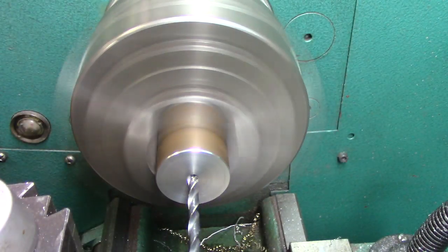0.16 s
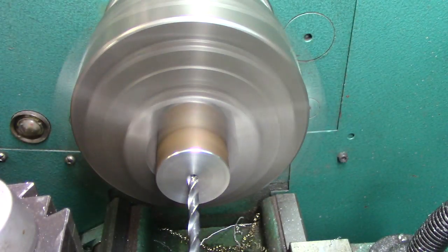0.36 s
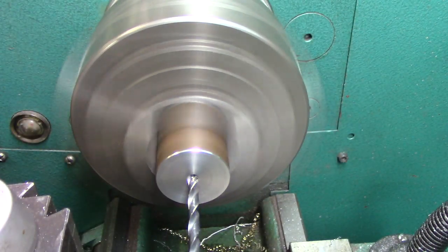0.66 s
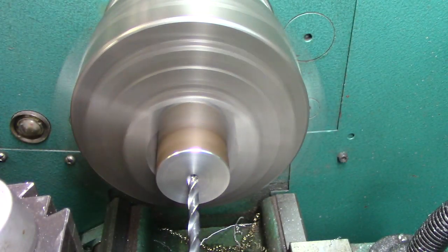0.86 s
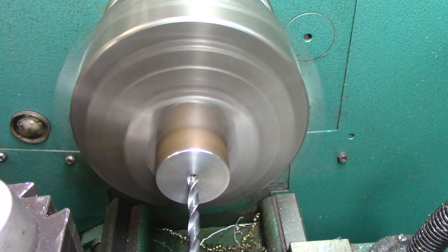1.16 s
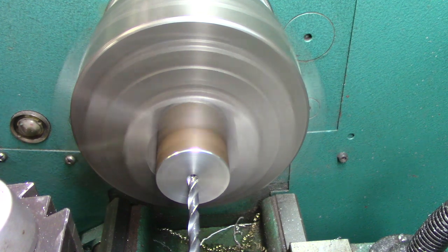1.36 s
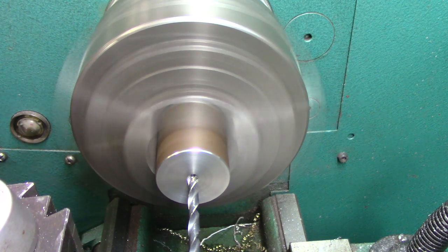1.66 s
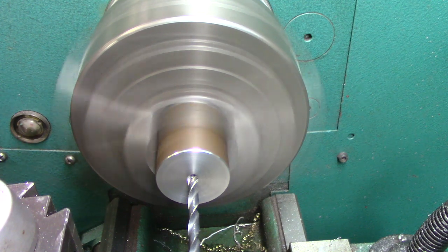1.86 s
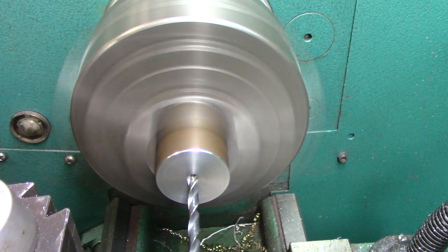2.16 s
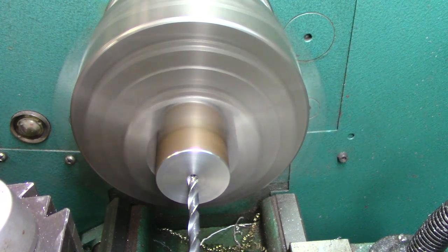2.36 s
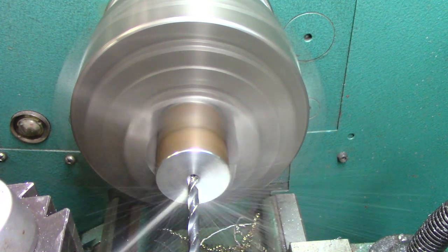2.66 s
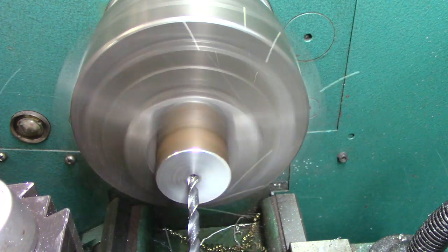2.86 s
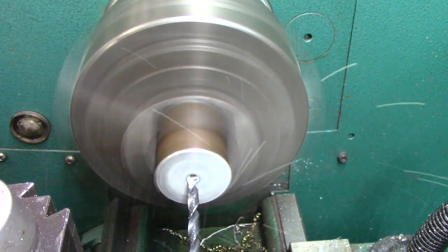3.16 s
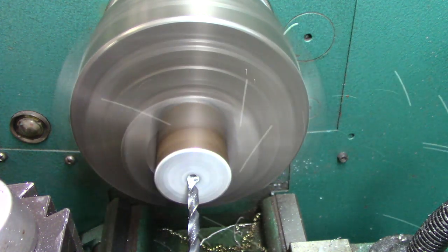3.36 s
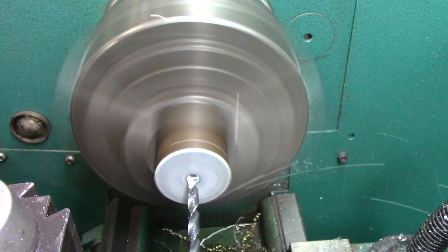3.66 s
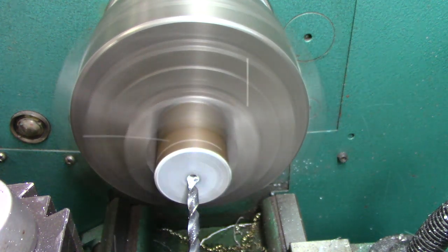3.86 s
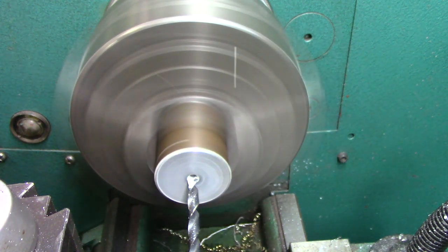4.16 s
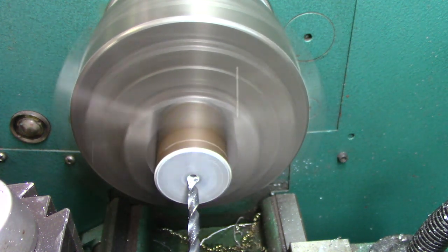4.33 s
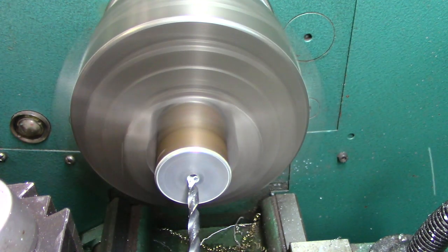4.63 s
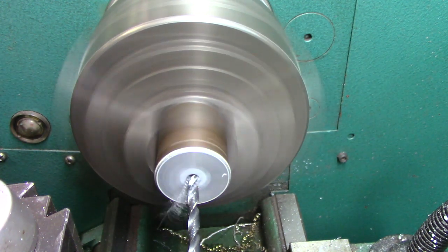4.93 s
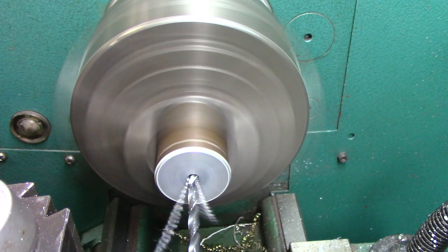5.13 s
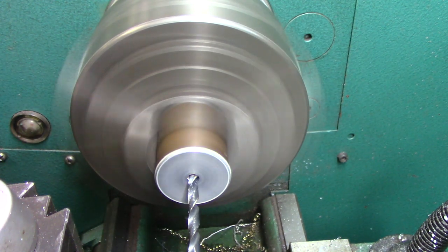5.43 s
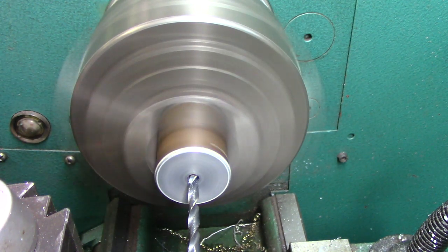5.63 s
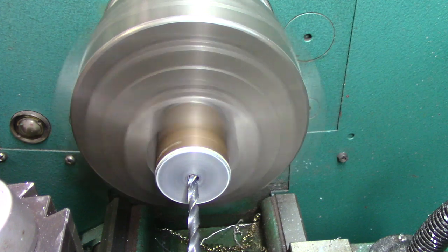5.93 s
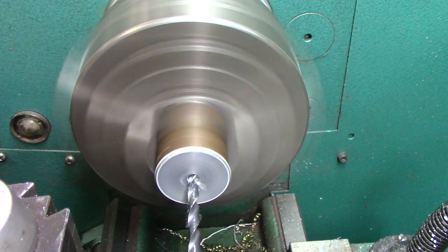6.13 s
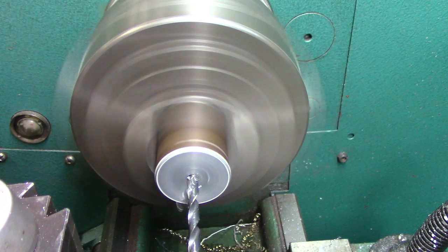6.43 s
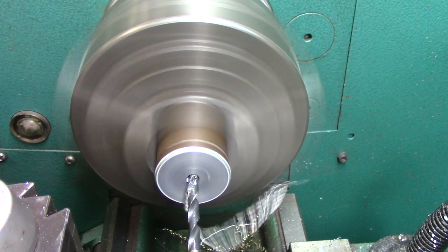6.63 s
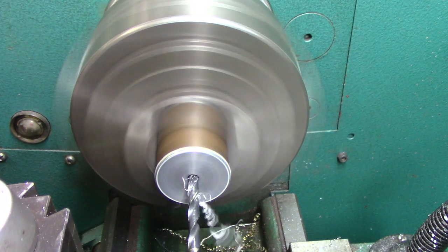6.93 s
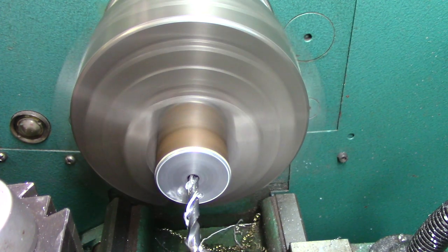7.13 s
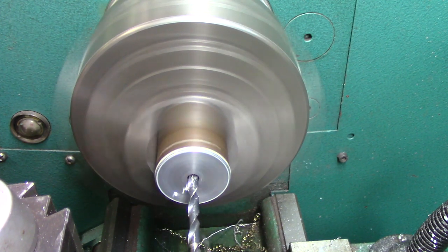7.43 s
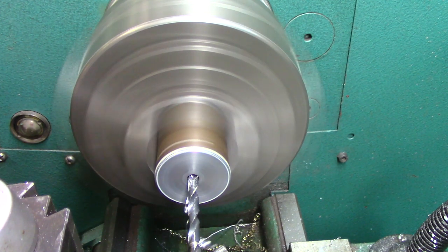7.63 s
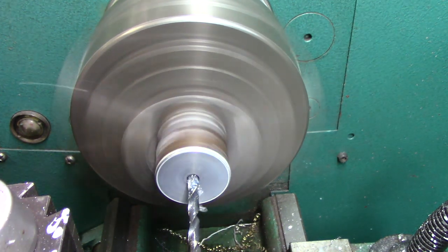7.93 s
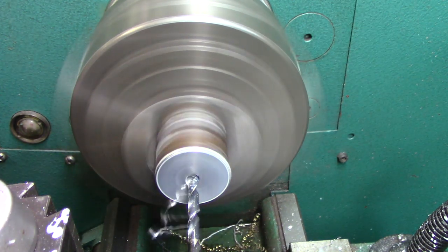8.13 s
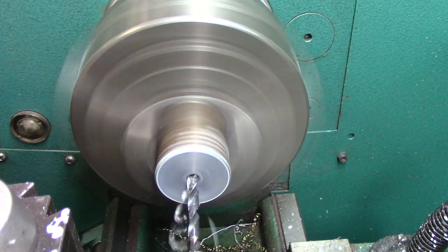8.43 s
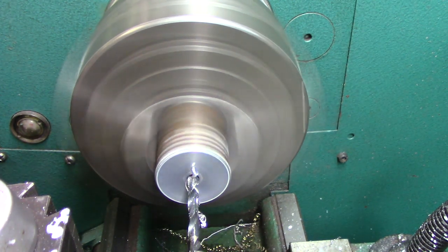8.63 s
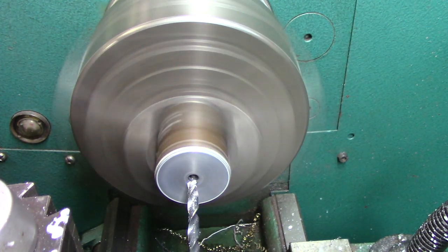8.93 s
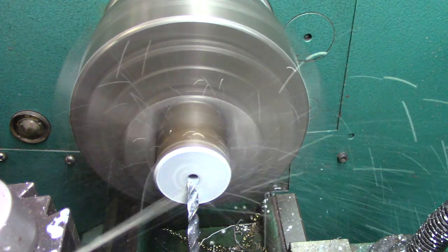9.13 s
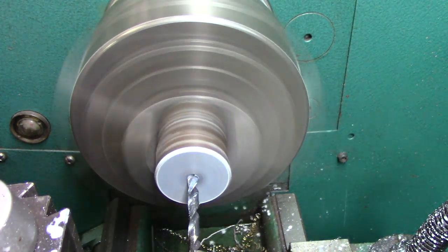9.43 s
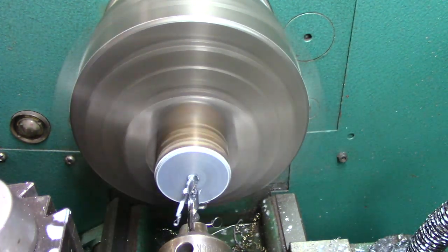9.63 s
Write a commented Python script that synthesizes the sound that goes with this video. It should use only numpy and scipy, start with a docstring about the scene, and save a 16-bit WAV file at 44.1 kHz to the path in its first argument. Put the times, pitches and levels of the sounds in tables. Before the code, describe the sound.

Whining, clattering lathe gears and two short sprays give way to a sped-up, high-pitched whine with drill squeals and a brief clunking halt.

```python
"""A geared metal lathe turns a bar: gear teeth whine and rattle in the headstock, the work sings thinly.
At 1.1 s a twist drill bites and the clatter thickens; at 2.6 and 2.9 s cutting oil hisses on the work.
From 4.5 s time runs ten times faster and the lathe turns thin and shrill, with squeals now and then.
At 5.8 s the drive drops out with a clunk and the spindle coasts down; at 6 s it clunks back to speed.
Near 7.9 s the lower spindle tone swells as the feed eases, and one dull tick falls near the end."""
import sys
import numpy as np
from scipy import signal
from scipy.fft import rfft, irfft, next_fast_len
from scipy.io import wavfile

SR = 44100
rng = np.random.default_rng(int(sys.argv[2]) if len(sys.argv) > 2 else 0)


def wav_record(signal):
    """Record a signal, one row per channel, as 16-bit PCM in the file named by sys.argv[1]."""
    frames = np.transpose(np.atleast_2d(signal))
    bounded = np.clip(frames, -1, 1)
    # unit amplitude maps onto the largest positive 16-bit level
    quanta = np.round(bounded * 32767).astype(np.int16)
    wavfile.write(sys.argv[1], SR, quanta)


N = 431738
TIME = np.arange(N) / SR

# Partials of the gear whine at natural pace: pitch_hz, relative_level_db
GEAR_PARTIALS = [(294.4, -25.5), (315.9, -20), (359.4, -24.5), (400.1, -24.5), (427.6, -18.5), (800, -8.5),
                 (900.1, -20), (1187.5, -13), (1200, 2), (1263.7, -18), (1358.2, -16), (1600, -9),
                 (1999, -16), (2263, -16.5), (2799, -16)]
# Slow swell and fade of the whine at natural pace: time_s, level_db
WHINE_SWELL = [(0, -32.5), (0.6, -33), (0.85, -31.5), (1.1, -31), (1.6, -30.0), (1.95, -32), (2.25, -31.0),
               (2.55, -33), (2.87, -28.5), (3.05, -32), (3.4, -30.5), (3.7, -31), (3.9, -28.5),
               (4.1, -31.5), (4.5, -30)]
# Broad EQ of the headstock clatter at natural pace: frequency_hz, gain_db
CLATTER_EQ = [(30, -46), (120, -40.5), (200, -32.5), (270, -19.5), (340, -16), (400, -4.5), (670, -7),
              (900, 0.5), (1600, -3), (2600, -6.5), (4000, -14.5), (6500, -25), (9000, -33.5),
              (15600, -44.5)]
# Narrow peaks and notches that colour the clatter, from housing and room: centre_hz, width_hz, gain_db
CLATTER_RIPPLE = [(178, 15, 6.5), (223, 23, 4.5), (359.5, 13, 6.5), (400.5, 11, 6.5), (427, 17, 7.5),
                  (440.5, 8, -5.5), (467.5, 11, -2.5), (504.5, 11, 4.5), (513.5, 11, -5.5),
                  (536.5, 15, 8.5), (558.5, 13, -5.5), (581, 23, 7.5), (732, 17, 5.5), (760, 17, 4.5),
                  (825, 15, 5.5), (863, 11, 3.5), (899, 15, 8.5), (945, 26, 2.5), (983, 15, -3.5),
                  (1015, 15, -4.5), (1110, 26, 2.5), (1184, 42, 5.5), (1243, 22, -4.5), (1267, 19, 9.5),
                  (1289, 17, -6.5), (1321, 17, 2.5), (1396, 17, 3.5), (1463, 17, 3.5), (1825, 110, 1.5),
                  (2355, 55, 2.5), (2801, 28, 6.5), (3190, 90, 2.5), (4100, 38, 3.5)]
# Thin singing of the turning work: pitch_hz, phase_waver_rad, free_level_db, drilling_level_db
WORK_TONES = [(4720, 2, -68, -67.5), (4960, 1.1, -57, -53), (5440, 2.1, -57.5, -63.5), (5873, 1, -62, -60)]
# Presses on the oil can: start_s, swell_s, peak_db
OIL_PRESSES = [(2.627, .06, -26), (2.909, .066, -27)]
# EQ of the oil hiss: frequency_hz, gain_db
SPRAY_EQ = [(1500, -33.5), (3000, -3), (5000, -9), (6200, -6.5), (7300, -2.5), (8800, -5.5), (9800, -1),
            (10800, -2.5), (13500, -5), (16000, -12)]
# Motor speed at fast pace, heard in the main mesh, sagging whenever the drill is fed: time_s, pitch_hz
MESH_PITCH = [(4.55, 12005), (4.8, 12007), (5.05, 11992), (5.45, 11998), (5.78, 12011), (6.2, 11980),
              (6.55, 11978), (6.8, 11989), (6.9, 11981), (7.12, 11989), (7.25, 11969), (7.64, 11984),
              (7.8, 12011), (8.03, 11973), (8.48, 11980), (8.75, 12011), (9.55, 12010), (9.79, 11972)]
# Three steady stretches at fast pace, unloaded: start_s, whine_db, lower_tone_db, rumble_db, rattle_db
FAST_MIX = [(4.53, -33, -39.5, -35.5, -29.5), (5.232, -38, -45, -40.5, -35), (5.99, -37, -42.5, -40, -34)]
# Upper spindle tone at fast pace, one list before the halt and one after: time_s, level_db
UPPER_TONE_FADES = [
    [(4.56, -56.5), (5.15, -43.5), (5.45, -57), (5.478, -54), (5.8, -61)],
    [(6.02, -56), (6.14, -62), (6.89, -54), (9.44, -58), (9.78, -45.5)],
]
# Drill squeals and scrapes, plus (at 4530 Hz) the lower spindle tone swelling as the feed eases:
# centre_s, half_length_s, pitch_hz, width_hz, peak_db
SQUEALS_AND_SWELL = [(4.838, .055, 7400, 250, -34), (5.17, 0.097, 4800, 420, -36.5),
                     (5.718, .01, 3800, 500, -43), (5.985, 0.0064, 5240, 486, -34),
                     (5.994, 0.018, 2630, 494, -48.5), (6.063, 0.011, 5440, 100, -33),
                     (6.09, .025, 5300, 120, -42), (6.08, 0.016, 3500, 400, -42),
                     (6.139, .035, 4820, 350, -41), (6.222, 0.024, 4760, 260, -40),
                     (7.17, 0.051, 12300, 200, -38.5), (7.881, .35, 4530, 40, -44.5),
                     (7.82, .2, 4000, 350, -50.5), (9.17, .5, 4000, 380, -43.5)]
# Knocks as the drive drops out and takes up again: start_s, level_db
DRIVE_KNOCKS = [(5.816, -33), (5.979, -41), (5.984, -32.5)]
# Ring of the chuck: pitch_hz, relative_level_db, t60_s
CHUCK_MODES = [(2240, -13, 0.041), (2790, -25, 0.46), (3500, -8, 0.053), (4220, -25, .1), (4830, -10, 0.35),
               (8400, -22, 0.33), (8980, 1.5, 0.049), (13900, -6, .02)]

FAST_FROM_S, FAST_PACE, CUTOFF_HZ = 4.531, 10, 15800
MAIN_MESH_HZ, SPINDLE_HZ, LAYSHAFT_HZ = 1200, 10.52, 12.5   # at natural pace
LOWER_TONE_HZ, UPPER_TONE_HZ = 452.8, 632.2   # spindle tones at natural pace
MOTOR_OFF_S, MOTOR_ON_S = 5.82, 6.0


def from_db(db):
    """Decibels to gain."""
    return 10 ** (np.asarray(db) / 20)


def rms_one(x):
    """Scale to unit power."""
    return x / np.sqrt(np.mean(x ** 2) + 1e-20)


def ramp(start_s, length_s):
    """A straight fade from 0 to 1."""
    return np.clip((TIME - start_s) / length_s, 0, 1)


def automation(rows):
    """Breakpoints (time_s, value) as a curve, one value a sample."""
    return np.interp(TIME, *np.transpose(rows))


def eq_db(points, hz):
    """Read an EQ curve on a log-frequency axis."""
    f, db = np.transpose(points)
    return np.interp(np.log(hz + 1), np.log(f), db)


def filtered(x, gain_at):
    """Pass a signal through a response given as a function of frequency."""
    size = next_fast_len(len(x), True)
    hz = np.arange(size // 2 + 1) * SR / size
    return irfft(rfft(x, size) * gain_at(hz), size)[:len(x)]


def drift(rate):
    """Smooth random modulation, changing about rate times a second; rms 1."""
    knots = rng.standard_normal(int(rate * N / SR) + 2)
    return rms_one(np.interp(TIME * rate, np.arange(len(knots)), knots))


def dull(clicks, top_hz=1500):
    """Soften clicks with a low-pass and make up their height."""
    low_pass = signal.butter(2, top_hz, fs=SR, output="sos")
    return signal.sosfilt(low_pass, clicks + 1e-18) * SR / (2 * top_hz)


def crackle(per_s=190, spread_db=3):
    """Dull clicks at random moments."""
    onsets = rng.random(N) < per_s / SR
    return dull(onsets * rng.choice([-1, 1], N) * from_db(spread_db * rng.standard_normal(N)))


def work_singing(bite, throb_db=3.0, waver_rate=45):
    """The turning work sings high, thin tones that pulse twice a turn and rebalance as the drill bites."""
    angle = 2 * np.pi * TIME * SPINDLE_HZ
    throb = rms_one(from_db(throb_db * (np.sin(angle) + np.sin(2 * angle))))
    tones = np.zeros(N)
    for hz, waver, free_db, drilling_db in WORK_TONES:
        level = from_db(free_db + bite * (drilling_db - free_db))
        tones += level * np.sin(2 * np.pi * hz * TIME + waver * drift(waver_rate))
    return np.sqrt(2) * throb * tones


def drive_clunks(rise_s=.001):
    """Backlash closes with a soft knock and the chuck rings on."""
    out, t = np.zeros(N), TIME[:SR // 2]
    ring = sum(from_db(db - 60 * t / t60) * np.sin(2 * np.pi * hz * t) for hz, db, t60 in CHUCK_MODES)
    attack = 1 - np.exp(-(t / rise_s) ** 2)
    for start_s, db in DRIVE_KNOCKS:
        start = int(start_s * SR)
        out[start:start + len(t)] += from_db(db) * ring * attack
    return out


def squeals_and_swell():
    """Wavering tones fade in and out: squeals of the rubbing drill, one swell of the lower spindle tone."""
    out = np.zeros(N)
    for centre_s, half_s, hz, width_hz, db in SQUEALS_AND_SWELL:
        start, size = int((centre_s - half_s) * SR), int(2 * half_s * SR)
        band = filtered(rng.standard_normal(size), lambda f: (1 + ((f - hz) / width_hz) ** 2 / 2) ** -2)
        tone = np.cos(np.angle(signal.hilbert(band)))   # flatten the level, keep the wandering pitch
        tone = filtered(tone, lambda f: np.exp(-((f - hz) / (2 * width_hz)) ** 2))   # keep it narrow
        out[start:start + size] += from_db(db) * np.hanning(size) * rms_one(tone)
    return out


def oil_spray(valve_s=.003, spit_s=.016, gap_s=.008, hold_s=.014, bounce_s=.0011):
    """Each press spits, catches on air, swells to a jet and dribbles; the hiss bounces off the chuck."""
    rise_db_per_s, fall_db_per_s, dribble_db_per_s = 249.5, 420, 200
    level = np.zeros(N)
    for start_s, swell_s, db in OIL_PRESSES:
        early = np.maximum(start_s + swell_s - hold_s - TIME, 0)
        late = np.maximum(TIME - start_s - swell_s, 0)
        spit = from_db(-5.5) * (1 - ramp(start_s + spit_s, valve_s))
        jet = from_db(-rise_db_per_s * early - fall_db_per_s * late)
        jet *= ramp(start_s + spit_s + gap_s, valve_s)
        dribble = from_db(-20 - dribble_db_per_s * late)   # what is left in the tube
        level += from_db(db) * ramp(start_s, valve_s) * np.max([spit, jet, dribble], axis=0)
    noise = rng.standard_normal(N)
    sputter_db, droplet_db = 2 * drift(260), 2 * drift(2500)
    hiss = filtered(noise * from_db(sputter_db + droplet_db),
                    lambda f: from_db(eq_db(SPRAY_EQ, f)) * (1 + .5 * np.exp(-2j * np.pi * f * bounce_s)))
    return level * rms_one(hiss)


def tooth_errors(turns, harmonics):
    """The flaws of a wheel: a random pattern that loops on every turn; rms 1."""
    pattern = irfft(np.r_[0, np.exp(2j * np.pi * rng.random(harmonics))], 4096)
    return rms_one(pattern)[(turns % 1 * len(pattern)).astype(int)]


def headstock_clatter(clock, pace, wear, throb_db, grit_db, ripple, grit_rate=250, split_hz=650):
    """Teeth rub and rattle in the headstock; returns the low rumble and the upper rattle, rms 1 each."""
    spindle, layshaft = clock * SPINDLE_HZ, clock * LAYSHAFT_HZ
    pressure = from_db(throb_db * tooth_errors(spindle, 6) + grit_db * drift(grit_rate * pace))
    blows = tooth_errors(spindle, 150) + tooth_errors(layshaft, 126)   # worn teeth, turn after turn
    blows *= np.sqrt(CUTOFF_HZ * pace / FAST_PACE / SR)
    force = pressure * rng.standard_normal(N) + wear * blows

    def colour(hz):
        """Broad EQ plus the narrow peaks and notches of housing and room."""
        ripple_db = sum(db / (1 + (2 * (hz - f) / width) ** 2) for f, width, db in CLATTER_RIPPLE)
        return from_db(eq_db(CLATTER_EQ, hz) + ripple * ripple_db)

    clatter = filtered(force, lambda f: colour(f / pace))
    rumble = filtered(clatter, lambda f: 1 / (1 + (f / pace / split_hz) ** 16))
    return rms_one(rumble), rms_one(clatter - rumble)


def gear_whine(clock, pace, tones, runout, tooth_error, waver, twist, waver_rate):
    """Meshing teeth sing; an off-centre wheel swells them once a turn and tooth errors add sidebands."""
    spindle, layshaft = clock * SPINDLE_HZ, clock * LAYSHAFT_HZ
    swell = 1 + runout * np.sin(2 * np.pi * layshaft)
    out = np.zeros(N)
    for hz, db in tones:
        if hz * pace < CUTOFF_HZ:
            flaws = tooth_errors(spindle, 3) + tooth_errors(layshaft, 5)
            force = swell + tooth_error * flaws + waver * drift(waver_rate * pace)
            slip = twist * hz / MAIN_MESH_HZ * drift(waver_rate * pace)   # shaft twist blurs the highs
            out += from_db(db) * force * np.sin(2 * np.pi * hz * clock + slip)
    return np.sqrt(2) * out


def natural_lathe():
    """The lathe at its own pace; as the drill bites, the clatter steps up and the upper tone ducks."""
    bite = ramp(start_s=1.117, length_s=.0434)
    rumble, rattle = headstock_clatter(TIME, 1, wear=.6, throb_db=-.7, grit_db=.5, ripple=.97)
    headstock = from_db(-37 + 1.94 * bite) * rumble + from_db(-31 + 2.5 * bite) * rattle
    whine_db = automation(WHINE_SWELL) - 1.56
    tones = [(hz, db + whine_db) for hz, db in GEAR_PARTIALS]
    tones += [(LOWER_TONE_HZ, -41), (UPPER_TONE_HZ, -46 - 6 * bite)]
    gears = gear_whine(TIME, .99, tones, runout=.22, tooth_error=.1, waver=.1, twist=.18, waver_rate=28)
    return gears + headstock + work_singing(bite)


def spindle_speed(coast_s=.145, creep=.02, kick_s=5.976, kick_rise_s=.009):
    """Share of full speed: friction brakes the undriven spindle until the restart jerks it back."""
    coasting = creep + (1 - creep) * (1 - ramp(MOTOR_OFF_S, coast_s)) ** 1.15
    return coasting + (1 - coasting) * ramp(kick_s, kick_rise_s)


def fast_faders(step_s=.005):
    """Four levels in dB that hold through each stretch and then step to the next."""
    levels = np.array(FAST_MIX[0][1:])[:, None]
    for start_s, *db in FAST_MIX[1:]:
        levels = levels + ramp(start_s, step_s) * (np.array(db)[:, None] - levels)
    return levels


def fast_lathe(free_mesh_hz=12011, full_sag_hz=38, grip_s=.006, tick_s=9.645):
    """The lathe in fast time: load bends the whine down; undriven, it cuts and the clatter runs down."""
    mesh_hz = automation(MESH_PITCH)
    load = np.clip((free_mesh_hz - mesh_hz) / full_sag_hz, 0, 1)
    whine_db, lower_db, rumble_db, rattle_db = fast_faders()
    upper_db = automation(np.vstack(UPPER_TONE_FADES))
    speed = spindle_speed()
    drive = 1 - ramp(MOTOR_OFF_S - grip_s, grip_s) + ramp(MOTOR_ON_S, grip_s)
    clock = np.cumsum(speed * mesh_hz / MAIN_MESH_HZ) / SR   # about ten machine seconds a second
    tones = [(hz, db + whine_db + 1.5 * load) for hz, db in GEAR_PARTIALS]
    tones += [(LOWER_TONE_HZ, lower_db - 1.5 * load), (UPPER_TONE_HZ, upper_db)]
    gears = gear_whine(clock, FAST_PACE, tones,
                       runout=.12, tooth_error=.07, waver=.13, twist=.29, waver_rate=14)
    rumble, rattle = headstock_clatter(clock, FAST_PACE, wear=.76, throb_db=2, grit_db=1, ripple=.89)
    headstock = from_db(rumble_db - 1.65 * load) * rumble + from_db(rattle_db) * rattle
    clicks = from_db(rattle_db - 36) * crackle()
    tick = from_db(-55) * dull(np.arange(N) == int(tick_s * SR))
    return drive * (gears + clicks) + speed ** 1.1 * headstock + tick


def scene():
    """Natural time snaps into fast time; everything sits dead centre."""
    crossfade = ramp(FAST_FROM_S - .002, .004)
    natural = natural_lathe() + oil_spray()
    fast = fast_lathe() + squeals_and_swell() + drive_clunks()
    mono = (1 - crossfade) * natural + crossfade * fast
    return np.array([mono, mono])


def record(dry):
    """A steep low-pass takes off the very top."""
    return signal.sosfilt(signal.ellip(12, .1, 90, CUTOFF_HZ, fs=SR, output="sos"), dry)


dry = scene()
out = record(dry)
wav_record(out)
```